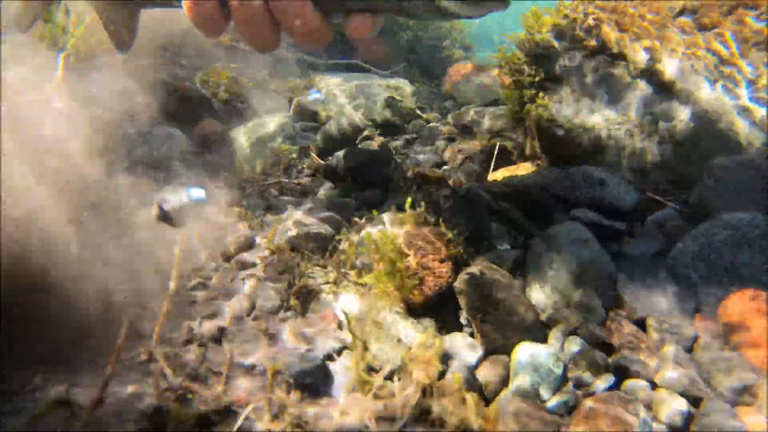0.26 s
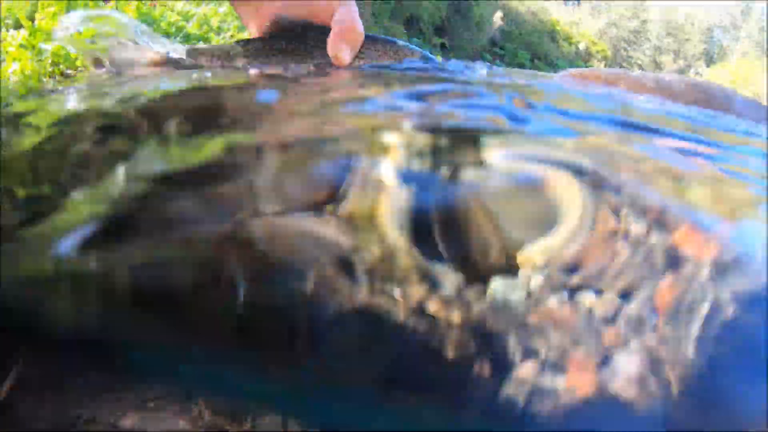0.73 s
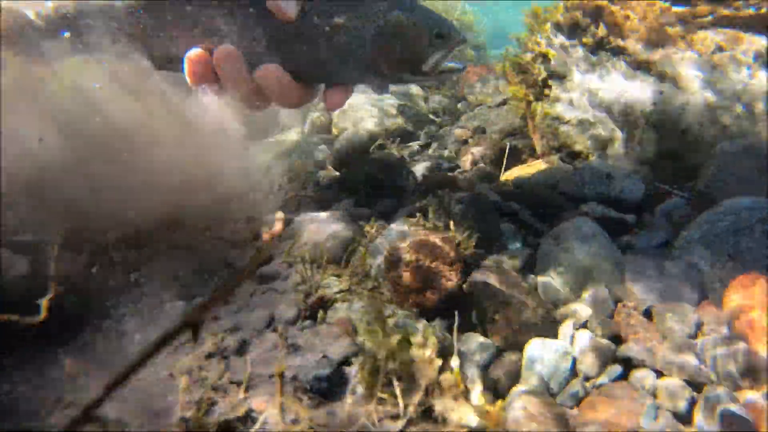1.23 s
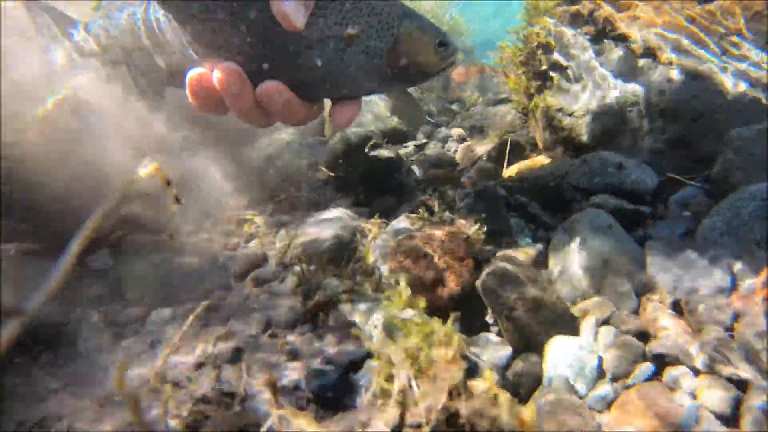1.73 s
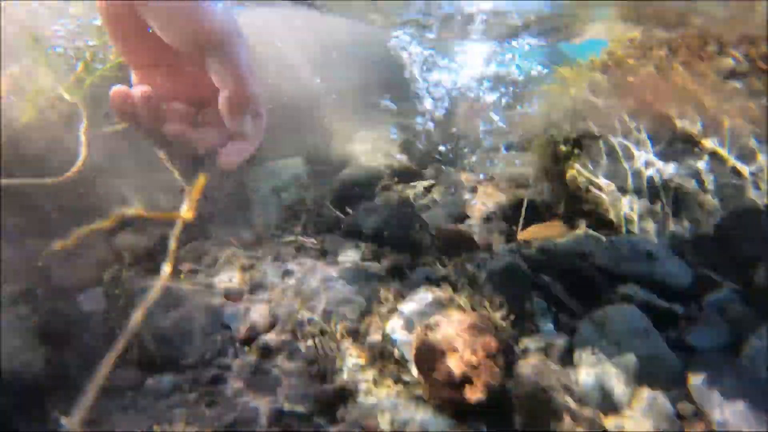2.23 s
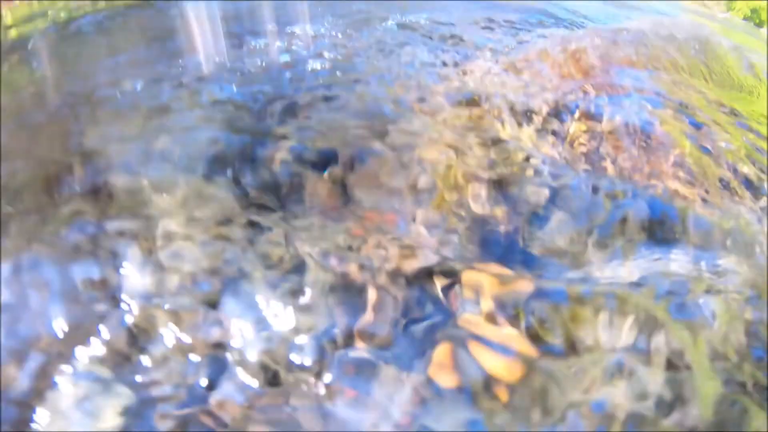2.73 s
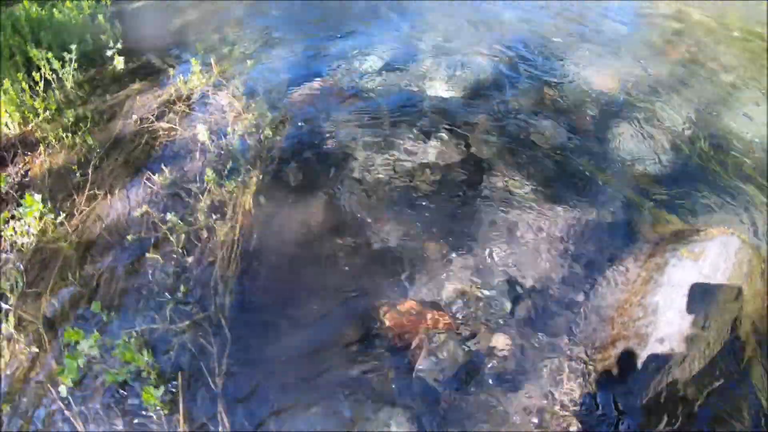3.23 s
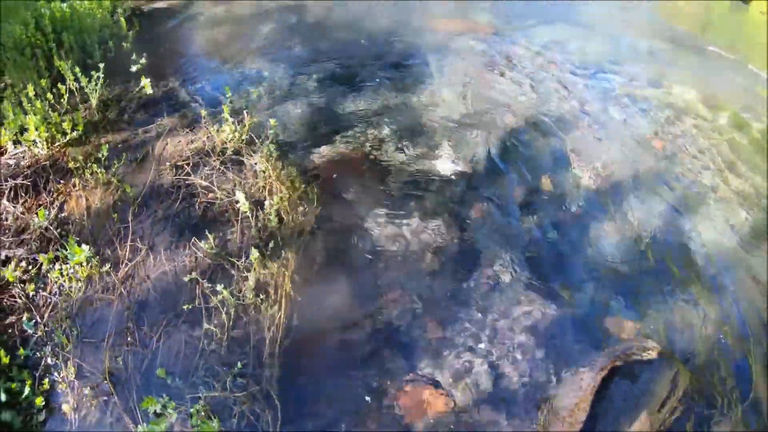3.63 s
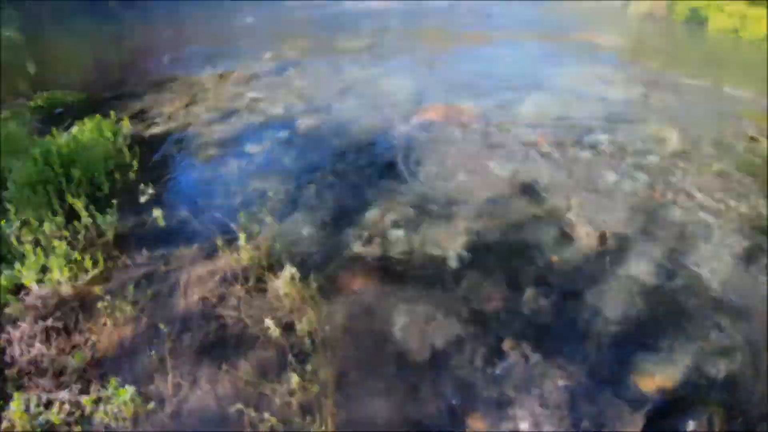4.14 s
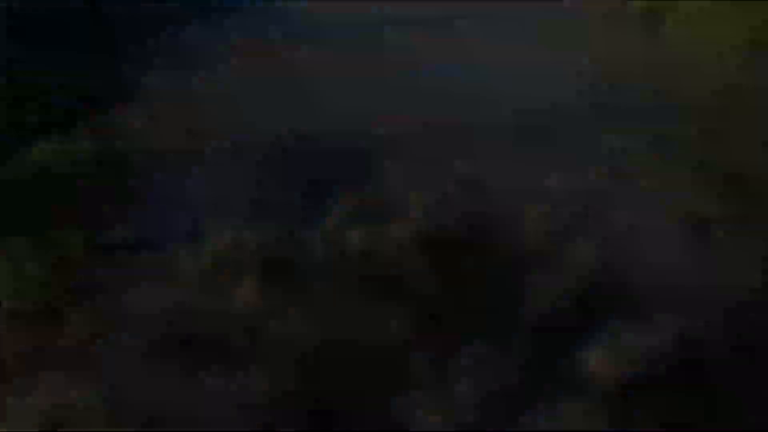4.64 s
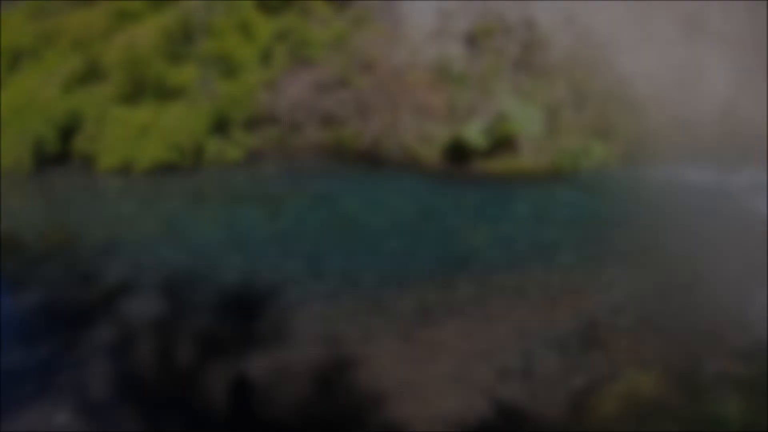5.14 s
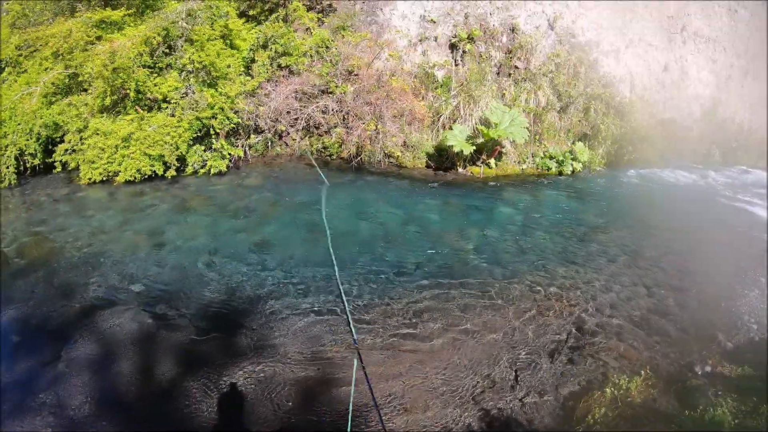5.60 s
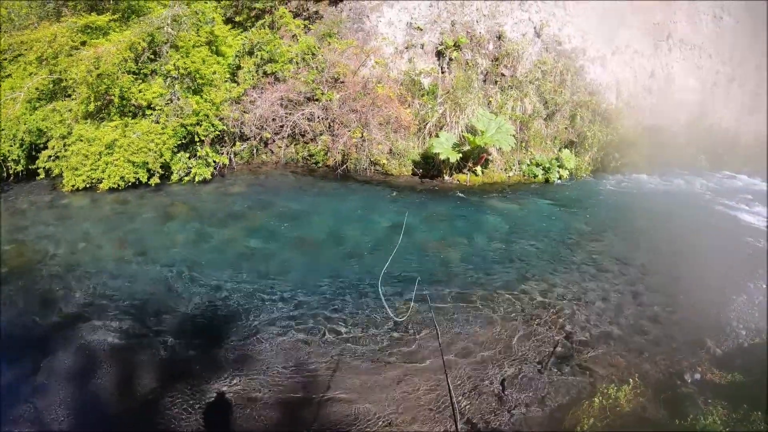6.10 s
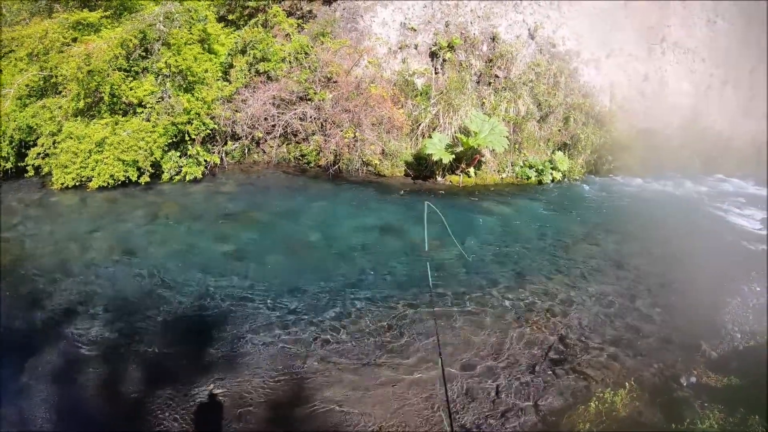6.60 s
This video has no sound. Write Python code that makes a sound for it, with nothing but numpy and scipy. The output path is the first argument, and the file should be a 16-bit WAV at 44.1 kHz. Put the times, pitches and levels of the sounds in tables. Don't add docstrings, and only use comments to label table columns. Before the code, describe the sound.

A submerged microphone hears dull, fading stream flow, clicks and bubbly glugs; suddenly the river opens into a smooth, steady, brighter rush in open air.

```python
import sys
import numpy as np
from scipy import signal
from scipy.fft import rfft, irfft, next_fast_len
from scipy.io import wavfile
from scipy.ndimage import uniform_filter1d, map_coordinates

SR = 44100
rng = np.random.default_rng(int(sys.argv[2]) if len(sys.argv) > 2 else 0)


def file_out(sig):
    cols = np.atleast_2d(sig).T
    lim = np.clip(cols, -1, 1)
    pcm = np.round(lim * 32767).astype(np.int16)
    wavfile.write(sys.argv[1], SR, pcm)


def voltage_ratio(decibels):
    exponent = np.asarray(decibels, float) / 20
    return 10 ** exponent


N = 302526
SURFACE_S = 4.0699


def unit(x):
    return x / np.sqrt(np.mean(x ** 2) + 1e-20)


def bumps(rows, sharp):
    t = np.arange(N) / SR
    return sum(voltage_ratio(db) * np.exp(-abs((t - s) / half_s) ** sharp) for s, db, half_s in rows)


def bandpass(x, low_hz, high_hz):
    return signal.sosfilt(signal.butter(5, [low_hz, high_hz], "bandpass", fs=SR, output="sos"), x)


def stream(spectrum, patchy_db=1.0, mask=None, size=12):
    _, _, z = signal.stft(rng.standard_normal(N + 1024), SR, nperseg=512, noverlap=384)
    field = uniform_filter1d(rng.standard_normal(z.shape), size=9, axis=0)
    field = uniform_filter1d(field, size=size, axis=1)
    noise = signal.istft(z * voltage_ratio(patchy_db * unit(field)), SR, nperseg=512, noverlap=384)[1]

    length = next_fast_len(len(noise))
    log_hz = np.log(np.fft.rfftfreq(length, 1 / SR) + 1)
    f, db = np.transpose(spectrum)
    colour = voltage_ratio(np.interp(log_hz, np.log(f), db, right=-140))
    noise = unit(irfft(rfft(noise, length) * colour, length))

    if mask:
        hz, s, z = signal.stft(noise, SR, nperseg=1024, noverlap=896)
        noise = signal.istft(z * mask(hz[:, None], s), SR, nperseg=1024, noverlap=896)[1]
    return noise[:N]


def rings(s, db, hz, swell_s, t60_s, rise, size):
    columns = (s, db, hz, swell_s, t60_s, rise)
    s, db, hz, swell_s, t60_s, rise = (np.reshape(v, (-1, 1)) for v in columns)
    t = np.arange(size) / SR
    turns = hz * (t + rise * t * t / t60_s)
    envelope = voltage_ratio(db - 60 * t / t60_s) * (1 - np.exp(-(t / swell_s) ** 2))
    wave = envelope * np.sin(2 * np.pi * turns)
    at = np.round(s * SR).astype(int) + np.arange(size)
    return np.bincount(at.ravel(), wave.ravel(), N + size + SR)[:N]


def swarm(count, hz, spread, cycles, scatter_db):
    when_s = rng.random(count) * N / SR
    pitch_hz = hz * np.exp(spread * np.clip(rng.standard_normal(count), -2, 2))
    db = scatter_db * np.minimum(rng.exponential(size=count), 3)
    return unit(rings(when_s, db, pitch_hz, 1 / pitch_hz, cycles * 3 / pitch_hz, 0.11, size=600))


def deep_flow(flow_db, sway_db):
    # hz, level_db (per Hz)
    surge_spectrum = [(12, -26.5), (25, -2), (60, -9.5), (110, -8.5), (160, -33), (400, -120)]
    # hz, level_db (per Hz)
    drone_spectrum = [(60, -120), (110, -26.5), (140, -5.5), (190, -2.5), (300, -8.5), (400, -7),
                      (520, -20), (1200, -120)]
    surge = voltage_ratio(flow_db + sway_db) * stream(surge_spectrum, patchy_db=2.0)
    drone = voltage_ratio(flow_db - 3.5 - 0.52 * sway_db) * stream(drone_spectrum, patchy_db=1.1)
    return surge + drone


def gurgle(flow_db):
    # hz, level_db (per Hz)
    spectrum = [(200, -120), (380, -11.5), (480, -1.5), (700, -4), (900, -7), (1100, -11.5), (1280, -15.5),
                (1420, -20), (1700, -29.5), (4000, -120)]
    # time_s, edge_hz
    edge_path = [(0, 1890), (2.3, 1640), (2.6, 1480), (3.4, 1380), (4.06, 1280)]

    def edge(hz, s):
        return 1 / (1 + (hz / np.interp(s, *np.transpose(edge_path))) ** 10)

    eddies = stream(spectrum, patchy_db=0.5, size=6, mask=edge)
    bubbles = swarm(count=1200, hz=774, spread=0.22, cycles=2.9, scatter_db=4.5)
    return voltage_ratio(flow_db) * (eddies + voltage_ratio(-20.5) * bubbles)


def crackle(count):
    pulses = np.zeros(N)
    pulses[rng.integers(0, N, count)] = voltage_ratio(3 * np.minimum(rng.exponential(size=count), 3))
    return unit(bandpass(pulses, 1600, 4300))


def silt(flow_db, laps):
    # hz, level_db (per Hz)
    spectrum = [(1200, -68), (2000, 2), (2600, -2.5), (3500, -11.5), (4600, -16.5), (5300, -24.5),
                (6500, -39), (12000, -120)]
    murk = voltage_ratio(-19.5 + 1.482 * flow_db) + voltage_ratio(-29) * laps
    grains = voltage_ratio(-16) * crackle(count=350)
    bubbles = voltage_ratio(-14) * swarm(count=1000, hz=3070, spread=0.13, cycles=3, scatter_db=1.0)
    return murk * (stream(spectrum, patchy_db=3.0, size=4) + grains + bubbles)


def slosh(laps):
    # hz, level_db (per Hz)
    spectrum = [(900, -60.5), (1400, 7), (1700, -5), (2200, -14.5), (2700, -24), (4000, -59), (8000, -120)]
    rest = voltage_ratio(-73.5)
    return (laps + rest) * stream(spectrum, patchy_db=5.5, size=6)


def gate(hz, s):
    # hz, shut_s
    shut_times = [(1250, 3.1), (1520, 1.077), (2100, 0.6), (4700, 0.23), (4760, 0.13), (9500, 0.12),
                  (11900, 1.02), (14600, .17)]
    # centre_hz, width_hz, shut_s
    linger = [(3000, 300, 0.618), (3700, 330, 0.46), (3990, 220, 0.615), (4470, 280, 0.435),
              (7600, 260, .25), (8170, 300, 0.37), (8440, 700, 0.326)]
    band = np.round(hz / 170)
    shut_s = np.interp(band * 170, *np.transpose(shut_times))
    scatter = 0.07 * rng.standard_normal(200)[band.astype(int)]
    shut_s = shut_s * (1 + scatter * (hz > 9000))
    for centre_hz, width_hz, until_s in linger:
        shut_s = np.where(abs(hz - centre_hz) < width_hz / 2, until_s, shut_s)

    before_splash = s < 0.072
    early = np.where((hz > 2800) & (hz < 7800) & before_splash, voltage_ratio(-13.0), 1)
    early = early * np.where((hz > 8800) & (hz < 11500) & before_splash, voltage_ratio(-4.0), 1)
    leak = voltage_ratio(-22) * ((hz > 4700) & (hz < 7600) & (s < 0.244))
    return np.maximum(leak, early * np.clip((shut_s - s) / (0.08 * shut_s + 0.005), 0, 1))


def surface_wash():
    # hz, level_db (per Hz)
    spectrum = [(900, -40.5), (1300, -4.5), (1700, 1), (2500, -3), (3200, -6.5), (4600, -16), (6000, -17),
                (8100, -26), (9500, -24), (10600, -34), (11300, -39.5), (13000, -51.5), (14200, -50.5),
                (15500, -54.5)]
    t = np.arange(N) / SR
    return voltage_ratio(-38.0 - 3.8 * np.maximum(t - 0.9, 0)) * stream(spectrum, patchy_db=-1.5, mask=gate)


def preamp_hiss():
    # hz, level_db (per Hz)
    spectrum = [(4000, -38), (6000, -15), (7700, -2), (8600, -3.5), (10000, -5.5), (11200, -2),
                (12500, 0.5), (14000, -2.5), (15500, -12)]
    return voltage_ratio(-81.5 - 1.8 * np.arange(N) / SR) * stream(spectrum, patchy_db=3.5, size=3)


def bubble_clouds():
    # centre_s, level_db, half_length_s
    clouds = [
        (.095, -47, 0.023),
        (.675, -70, 0.013),
        (1.145, -76, .02),
        (2.43, -66.5, 0.015),
    ]
    # hz, level_db (per Hz)
    spectrum = [(1500, -31), (2500, -7), (4500, -2), (6000, -12.5), (8500, -10), (11000, -21), (14000, -59)]
    return bumps(clouds, sharp=3.2) * stream(spectrum, patchy_db=5.0, size=2)


def submerged():
    # time_s, flow_db, sway_db (case sway over the flow)
    flow_path = [(0.0, -31, -16), (0.13, -29, -10), (0.44, -29.5, -11.5), (0.76, -29.5, -8.5),
                 (1.15, -31, -12.5), (1.41, -32.5, -12.5), (1.88, -33.5, -3.5), (2.28, -33.5, -7),
                 (2.46, -33, -1.5), (2.7, -38, -1), (2.92, -37.5, -6.5), (3.41, -39.5, -7),
                 (3.66, -40.5, -17), (4.06, -41.5, -8)]
    # centre_s, level_db, half_length_s
    lap_times = [(1.25, -54, 0.17), (1.78, -62, 0.19), (2.106, -50.5, 0.055), (2.382, -58, 0.29),
                 (2.803, -53.5, 0.055), (3.02, -51, 0.05), (3.11, -50.5, 0.05), (3.214, -49, 0.022),
                 (3.307, -51.5, 0.055), (3.5, -60, 0.07), (3.725, -59, 0.041)]
    time_s, flow_db, sway_db = np.transpose(flow_path)
    t = np.arange(N) / SR
    flow_db, sway_db = np.interp(t, time_s, flow_db), np.interp(t, time_s, sway_db)
    laps = bumps(lap_times, sharp=1.8)
    body = deep_flow(flow_db, sway_db) + gurgle(flow_db) + silt(flow_db, laps) + slosh(laps)
    return body + surface_wash() + preamp_hiss() + bubble_clouds()


def ticks(rows, swell_turns):
    s, db, hz, t60_s = np.transpose(rows)
    return rings(s, db + 6, hz, swell_turns / hz, t60_s, 0.091, size=1600)


def small_hits():
    # start_s, level_db, pitch_hz, t60_s
    beads = [(0.713, -34, 1680, 0.013), (0.9095, -38, 1630, 0.015), (0.985, -39, 1660, 0.015),
             (1.1682, -56, 1600, 0.015), (1.3545, -31, 1700, 0.0096), (1.475, -41, 1620, 0.011),
             (2.0966, -50, 1600, 0.013), (2.2909, -47, 1720, 0.015), (2.3455, -35, 2080, 0.028),
             (2.3947, -52, 1660, 0.015), (2.4281, -48, 1790, 0.015), (2.7029, -50, 2440, 0.024),
             (2.8185, -45, 2160, 0.013), (2.9664, -38, 1580, 0.023), (3.031, -51, 1740, 0.015),
             (3.2111, -48, 1550, 0.013), (3.9868, -56, 2000, 0.008), (4.022, -55, 1650, .012),
             (2.82, -43, 1410, 0.045)]
    # start_s, level_db, pitch_hz
    grit = [(0.0523, -37, 3070), (0.0726, -27, 3040), (0.623, -60, 3250), (0.6638, -51, 3000),
            (0.7122, -46, 3160), (0.8713, -54, 3000), (1.002, -59, 3440), (1.3543, -44, 3900),
            (1.5632, -65, 2980), (1.7681, -62, 3300), (1.7997, -57, 3260), (1.8158, -60, 3530),
            (1.936, -55, 3610), (1.9738, -59, 3550), (2.0057, -53.5, 3590), (2.0244, -54, 3500),
            (2.0521, -58, 3300), (2.122, -51, 3400), (2.1295, -48.5, 3280), (2.155, -56, 3200),
            (2.3086, -60, 3020), (2.331, -58, 3310), (2.6487, -41.5, 3320), (2.791, -60, 3770),
            (2.8623, -55, 3030)]
    # start_s, level_db, pitch_hz
    sand = [(0.0193, -35, 8200), (0.0745, -38, 7330), (0.388, -74, 6010), (0.6674, -66, 6000),
            (0.9636, -60, 6530), (1.1672, -61, 8100), (1.5638, -66, 8070), (1.6531, -65, 6330),
            (1.719, -61, 6090), (2.0257, -55, 8200), (2.0607, -64, 7400), (2.0756, -66, 6100),
            (2.3316, -58, 7530), (2.4199, -63, 8020), (2.4378, -37.5, 7290), (2.831, -67, 7760)]
    # start_s, level_db, pitch_hz
    dust = [(0.869, -60.5, 13870), (0.9055, -55.5, 13930), (1.0026, -65, 12950), (1.085, -60, 12400),
            (1.3534, -63, 12000), (2.42, -72, 12000), (2.5527, -63, 11400), (2.6674, -64, 12000),
            (2.7443, -60, 12100), (2.833, -59.5, 13050), (2.9782, -66, 11700), (3.2142, -63.5, 12250),
            (3.3209, -66, 12200), (3.511, -74, 12100)]
    # start_s, level_db, pitch_hz, t60_s
    flecks = [(.1275, -48, 6000, .004), (.1955, -46, 5600, 0.0037), (.1955, -52, 8000, .003),
              (.235, -57, 5300, 0.0073), (.675, -53, 3300, .02), (.685, -57, 3600, .01),
              (0.772, -39, 2110, 0.011), (2.392, -58, 4300, .006), (2.426, -51, 5000, .008),
              (2.507, -47, 3020, 0.0053), (2.875, -70, 4600, .006), (2.928, -65, 4400, 0.0054),
              (2.998, -55, 2350, 0.018), (3.335, -54, 2150, 0.036), (3.268, -56, 2180, 0.025),
              (.053, -44, 4970, .005), (.0625, -37, 4200, .006), (.92, -50, 2300, .015),
                (1.008, -56, 3300, .008), (1.464, -53, 3000, .004), (1.506, -59, 2600, .005),
                (1.521, -66, 3500, 0.0086), (1.564, -59, 4200, .006), (1.586, -59.5, 2900, .01),
                (1.619, -55, 2100, .01), (1.719, -52.5, 4200, .005), (2.31, -37, 1430, .025),
                (2.332, -62, 4280, .005), (2.338, -57, 3300, 0.0056), (2.397, -52, 2300, .012),
                (2.42, -52, 3980, .006), (2.4375, -48, 3400, 0.0046), (2.444, -54, 2500, .005),
                (2.69, -53, 2880, 0.0091), (2.7035, -42, 1800, 0.0067), (2.776, -39, 1270, 0.037),
                (2.837, -62, 3600, .008), (2.884, -61, 3100, .008), (2.898, -59, 2600, .012),
                (2.944, -59, 3500, .005), (3.013, -43, 1480, .02), (3.028, -61, 3300, .005),
                (3.108, -42, 1450, .025), (3.125, -59, 3600, .004), (3.172, -54, 1700, .015),
                (3.24, -58, 3400, 0.0044), (3.296, -49, 1520, 0.027), (3.678, -66, 2800, .006),
                (3.755, -51, 1600, .02), (3.63, -68, 3100, .004)]

    def lasting(rows, t60_s):
        return [(*row, t60_s) for row in rows]

    case_dulling = signal.butter(4, 5200, fs=SR, output="sos")
    dull = signal.sosfilt(case_dulling, ticks(beads + lasting(grit, 0.0088), swell_turns=1.0))
    fine = lasting(sand, 0.0039) + lasting(dust, 0.003) + flecks
    return dull + ticks(fine, swell_turns=1.1)


def snaps():
    # start_s, level_db, bright_db (over level_db)
    snap_times = [(0.0177, -29, -1), (0.0729, -22.5, -17), (0.196, -31, -26), (0.7645, -39, -49),
                  (0.8454, -46, -41), (0.9634, -21.5, -37), (1.1674, -53, -20), (1.3557, -38, -45),
                  (1.533, -46, -29), (1.58, -47, -32), (1.6529, -50, -27), (1.719, -54, -4),
                  (1.9926, -47, -17), (2.0601, -50, -24), (2.0944, -43, -23), (2.4205, -45, -17),
                  (2.4367, -46, -9), (2.5003, -41.5, -46), (2.505, -44, -39), (2.552, -45, -30),
                  (2.5985, -47, -39), (2.6198, -54, -35), (2.689, -45, -36), (2.803, -47, -32),
                  (2.9585, -58, -18), (3.127, -50, -36), (3.2389, -52, -36), (3.6296, -63, -28)]
    t = np.arange(300) / SR
    dull, bright = np.zeros((2, N))
    for s, db, bright_db in snap_times:
        puff = (t == 0) + 0.31 * rng.standard_normal((2, len(t))) * voltage_ratio(-60 * t / 0.0058)
        dull[round(s * SR):][:len(t)] += voltage_ratio(db + 20.0) * puff[0]
        bright[round(s * SR):][:len(t)] += voltage_ratio(db + bright_db + 12.0) * puff[1]
    low = bandpass(dull, 1300, 2670) + voltage_ratio(-5.5) * bandpass(dull, 2680, 3980)
    return low + bandpass(bright, 4100, 11500)


def large_hits():
    # start_s, level_db, pitch_hz, t60_s, rise (share of pitch)
    gulps = [(.712, -9, 1450, 0.025, 0.1), (.905, -2.5, 820, 0.029, 0.15), (1.835, -12, 188, 0.047, 0.04),
             (2.021, -4.5, 765, 0.035, 0.12), (2.036, -11, 203, 0.079, 0), (2.067, -12, 218, 0.054, 0.04),
             (2.088, -6.5, 750, 0.047, 0), (2.108, -20, 170, 0.055, 0), (2.14, -14, 282, 0.063, 0.33),
             (2.158, -2.5, 570, 0.032, 0.15), (2.163, 1, 693, 0.024, 0.02), (2.172, -11, 614, 0.034, 0.16),
             (2.182, -15, 1080, 0.042, 0.12), (2.192, -13, 878, 0.043, 0.09), (2.49, -15, 54, 0.1, 0.1),
             (1.543, -16, 560, 0.049, .05), (1.957, -25, 670, 0.046, 0), (2.385, -15.5, 730, 0.058, 0.02),
             (2.611, -18.5, 604, 0.053, 0.12), (3.371, -22, 605, 0.05, 0.05),
             (2.226, -15.5, 393, .06, 0.16), (2.243, -20, 155, 0.064, 0.06), (2.275, -22, 130, .06, 0.1)]
    # start_s, level_db, pitch_hz, t60_s, rise (share of pitch)
    knock = [
        (1.6548, -5.5, 190, 0.031, 0),
        (1.6965, -10, 480, 0.012, 0),
        (1.6535, -14.5, 79, 0.074, -0.23),
        (1.7015, -7, 221, 0.013, .2),
        (1.7238, -7.5, 250, 0.012, 0),
        (2.1, -23, 155, 0.051, -0.21),
        (2.375, -20, 69, 0.045, -0.048),
    ]
    # start_s, level_db, pitch_hz, t60_s
    heaves = [
        (.58, -10, 24, 0.12),
        (4.33, -15, 81.8, 0.32),
        (4.72, -21, 58, 0.29),
        (5.08, -13.5, 62, 0.25),
        (5.431, -10.5, 67, 0.29),
        (5.831, -16, 82, 0.18),
        (6.6, -16, 55.3, 0.35),
        (6.72, -16, 68.6, 0.23),
    ]
    # start_s, level_db, pitch_hz, swell_s, t60_s, rise (share of pitch)
    dent = (1.6538, 0, 451, 0.2, 0.05, 0.5)
    rows = [(s, db, hz, 0.0068, t60_s, rise) for s, db, hz, t60_s, rise in gulps]
    rows += [(s, db, hz, 0.00084, t60_s, rise) for s, db, hz, t60_s, rise in knock]
    rows += [(s, db, hz, 0.21 * t60_s, t60_s, 0.2) for s, db, hz, t60_s in heaves]
    return rings(*np.transpose(rows), size=15000) - rings(*dent, size=600)


def housing():
    return small_hits() + snaps() + large_hits()


def open_river():
    # hz, level_db (per Hz)
    rumble_spectrum = [(12, -27), (30, -7), (45, -13), (65, -3.5), (105, -4), (150, -27), (400, -120)]
    # hz, level_db (per Hz)
    spray_spectrum = [(500, -55), (1200, -4.5), (1700, -5), (2500, -10), (3050, -11), (3900, -17.5),
                      (5250, -15.5), (6400, -26), (7800, -26), (9000, -33), (10600, -31.5), (11250, -43),
                      (12400, -41), (15100, -57)]
    # hz, level_db (per Hz)
    rush_spectrum = [(60, -38), (110, -5.5), (180, -1), (300, -5.5), (600, -9.5), (900, -13.5), (1100, -18),
                     (1500, -24), (3000, -39), (8000, -120)]
    t = np.arange(N) / SR
    rumble_db = -39.5 - 2.5 * np.exp(-np.maximum(t - SURFACE_S, 0) / 0.6)
    rumble = voltage_ratio(rumble_db) * stream(rumble_spectrum, patchy_db=2.2)
    spray = voltage_ratio(-42) * stream(spray_spectrum, patchy_db=0.6)
    bubbles = swarm(count=1600, hz=424, spread=0.4, cycles=7.8, scatter_db=-2.5)
    rush = stream(rush_spectrum, patchy_db=0.0) + voltage_ratio(-11.5) * bubbles
    swing_db = 0.32 * map_coordinates(rng.standard_normal(70), [8 * t])
    return rumble + spray + voltage_ratio(-25.5 + swing_db) * rush


def scene():
    t = np.arange(N) / SR - SURFACE_S
    jump = -voltage_ratio(-15.5) * np.exp(-np.maximum(t, 0) / 0.0016)
    river = np.where(t < 0, submerged(), open_river() + jump)
    return (river + housing())[None]


def band_limit(x):
    return signal.sosfilt(signal.butter(12, 15700, fs=SR, output="sos"), x)


def record(dry):
    return band_limit(dry)


dry = scene()
out = record(dry)
file_out(out)
```